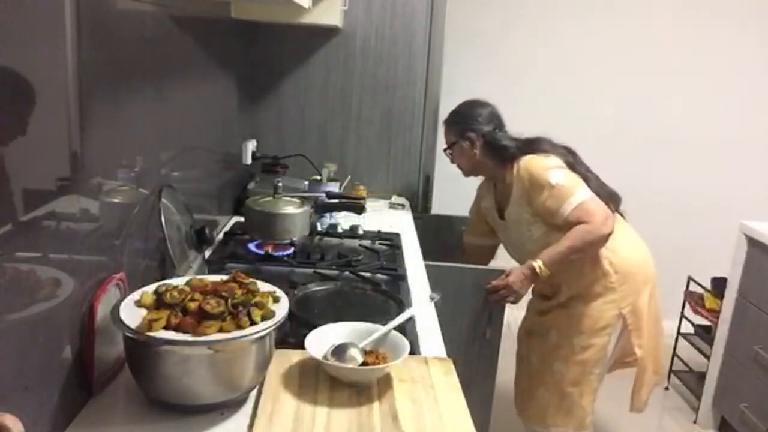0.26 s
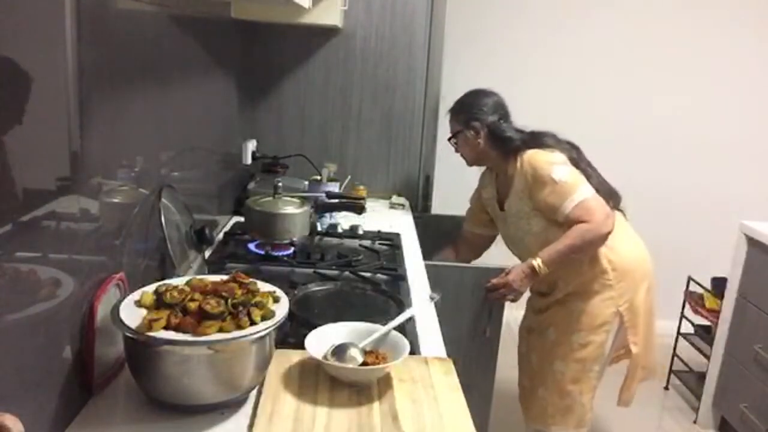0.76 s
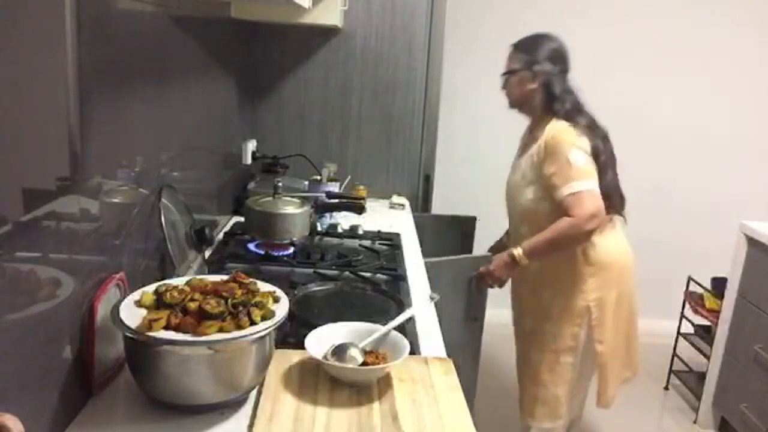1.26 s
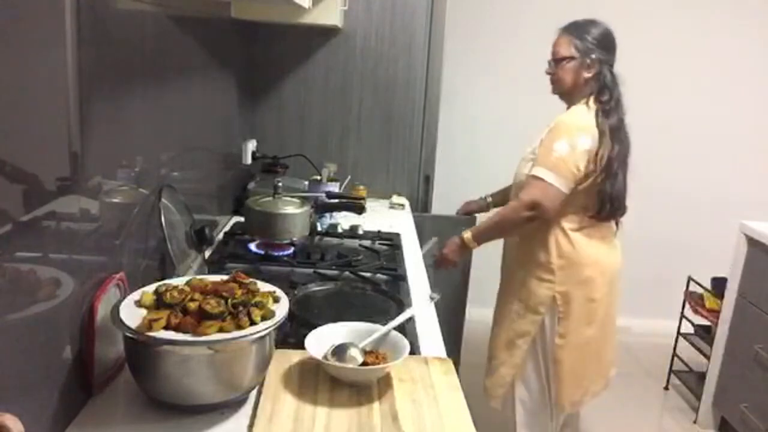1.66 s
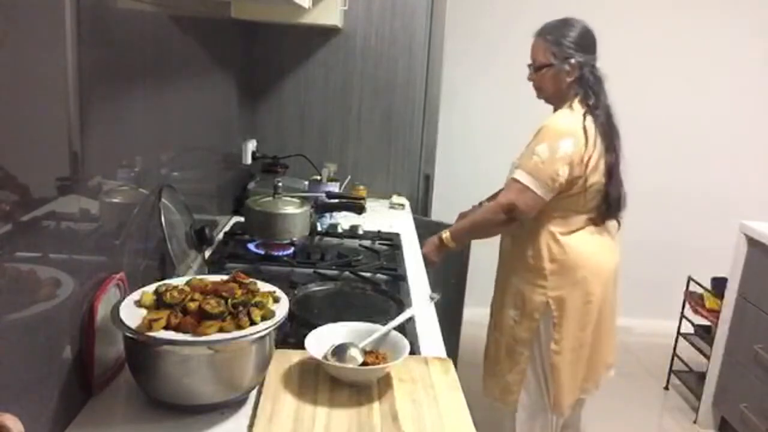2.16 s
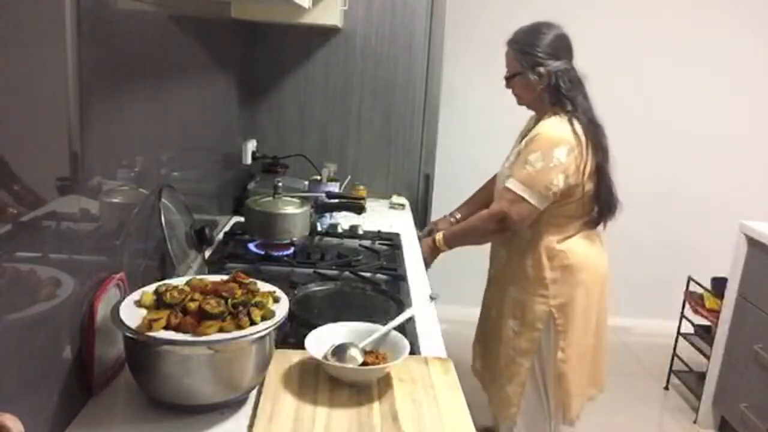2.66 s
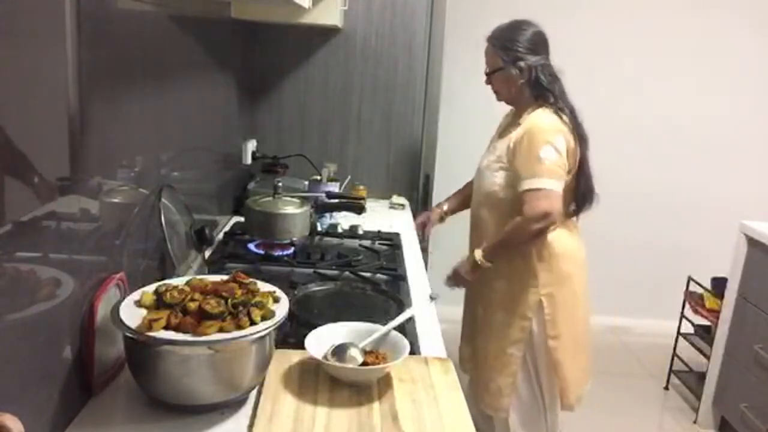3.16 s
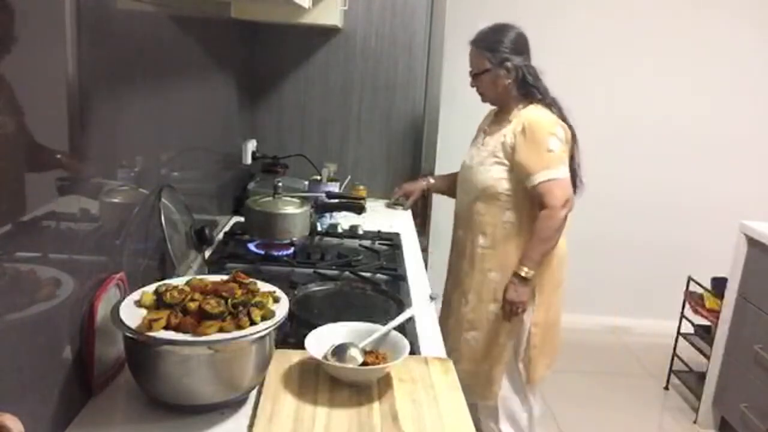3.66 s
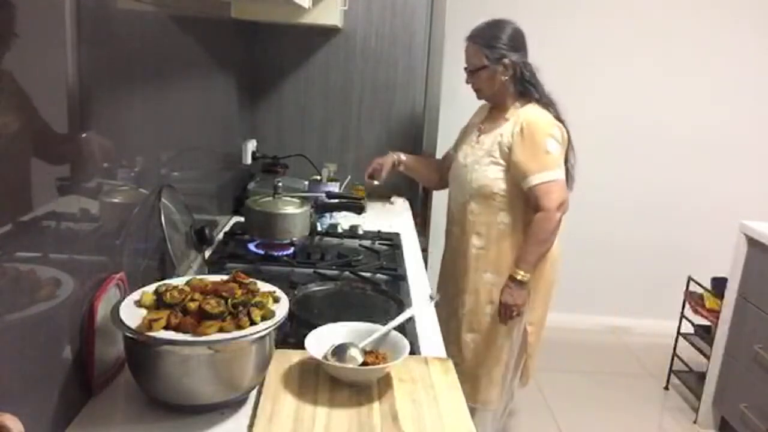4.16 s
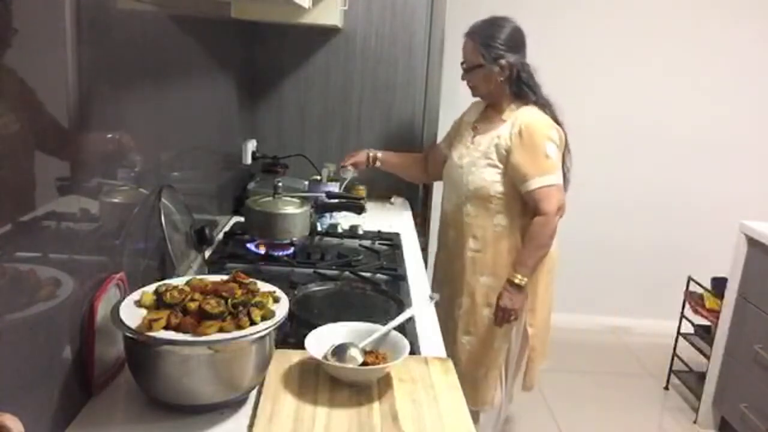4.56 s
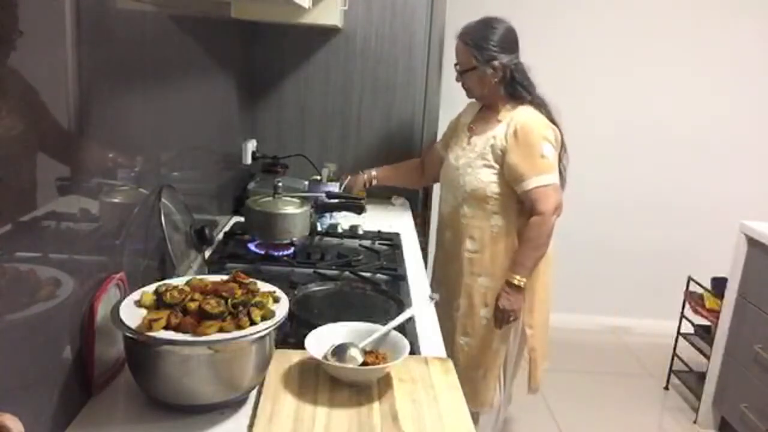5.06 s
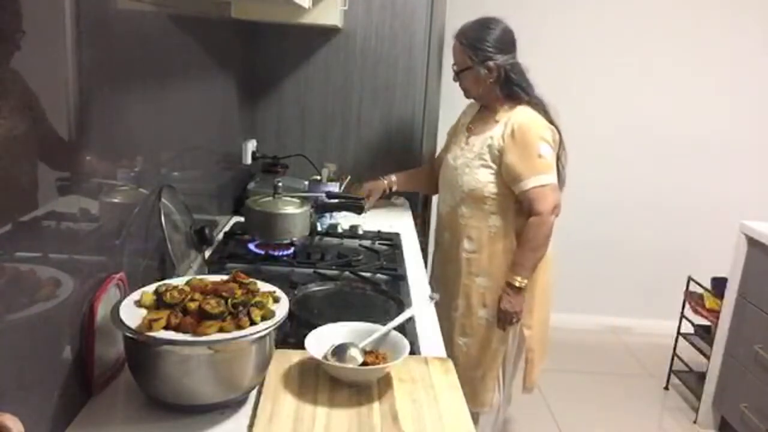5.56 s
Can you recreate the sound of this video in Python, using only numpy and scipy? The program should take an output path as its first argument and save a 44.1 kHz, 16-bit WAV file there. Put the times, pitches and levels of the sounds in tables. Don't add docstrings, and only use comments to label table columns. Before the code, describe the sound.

In a small echoing kitchen, a faint fan hum and gas hiss run throughout. Pots and a pan knock inside a cupboard, then after a pause a wooden door bumps, catches and rubs. It slams with a heavy, rattling boom, by far the loudest moment. Bangles tick, a tool is set down in quick taps, and a small lid clinks. One small microphone several steps away fades quiet moments.

```python
import sys
import numpy as np
from scipy import signal
from scipy.io import wavfile
from scipy.ndimage import uniform_filter1d

SR = 44100
rng = np.random.default_rng(int(sys.argv[2]) if len(sys.argv) > 2 else 0)


def ratio_of_db(decibels):
    return 10 ** (np.asarray(decibels, float) / 20)


def inscribe(sig):
    pcm = np.round(np.clip(np.atleast_2d(sig).T, -1, 1) * 32767)
    wavfile.write(sys.argv[1], SR, pcm.astype(np.int16))


N = 256220


def evened(x):
    return x / np.sqrt(np.mean(x ** 2) + 1e-20)


def read(points, hz):
    f, value = np.transpose(points)
    return np.interp(np.log(hz + 1), np.log(f + 1), value)


def follow(rows):
    s, db = np.transpose(rows)
    return ratio_of_db(np.interp(np.arange(N) / SR, s, db, left=-200, right=-200))


def swells(rows):
    t = np.arange(N) / SR
    total_db = sum(db * np.interp(t, [s - before, s, s + after], [0, 1, 0]) for s, db, before, after in rows)
    return ratio_of_db(total_db)


def waver(depth_db, size):
    return ratio_of_db(depth_db * evened(uniform_filter1d(rng.standard_normal(N), size=size)))


def colour(x, points):
    hz = abs(np.fft.fftfreq(8192, 1 / SR))
    log_gain = np.log(ratio_of_db(np.maximum(read(points, hz), -90)))
    taps = np.fft.ifft(np.exp(np.conj(signal.hilbert(log_gain)))).real[:4096]
    return signal.fftconvolve(x, taps)[:len(x)]


def whistle(bands):
    out = np.zeros(N)
    for hz, width, db in bands:
        r = np.exp(-np.pi * width / SR)
        turn = np.exp(2j * np.pi * hz * np.arange(N) / SR)
        slow = signal.lfilter([1], np.convolve([1, -r], [1, -r]), rng.standard_normal(N) / turn)
        out += ratio_of_db(db) * evened((slow * turn).real)
    return out


def rush(shape, patchy_db):
    frames, hz = N // 256 + 5, np.fft.rfftfreq(1024, 1 / SR)
    a, b, patches = rng.standard_normal((frames, 513, 3)).T
    patches = evened(uniform_filter1d(uniform_filter1d(patches, 4, 0), 12, 1))
    z = (a + 1j * b) * ratio_of_db(read(shape, hz)[:, None] + patchy_db * patches)
    return evened(signal.istft(z, nperseg=1024, noverlap=768)[1][:N])


# (frequency [Hz], time to fall 60 dB [s])
WALL_RING = [(60, 1), (200, 0.72), (700, 0.66), (2000, 0.75), (5000, 0.75), (12000, 0.11)]


def walls(dryness):
    build_up = np.minimum(np.arange(SR) / (0.0083 * SR), 1)
    taps = rng.standard_normal(SR) * (rng.random(SR) < .03) * build_up
    hz, t, z = signal.stft(taps, SR, nperseg=512)
    fall = ratio_of_db(-60 * dryness * t / read(WALL_RING, hz)[:, None])
    tail = signal.istft(z * fall, SR, nperseg=512)[1]
    return tail / np.linalg.norm(tail)


def contact(shape, tilt_db, u):
    tilted = [(hz, db + tilt_db * np.log2(hz / 1000)) for hz, db in shape]
    grains = rng.standard_normal(SR) * (0.61 + (rng.random(SR) < .08) * 1.6)
    rattle = colour(grains * u * np.exp(-3 * u), tilted)
    return rattle / (np.sqrt(uniform_filter1d(rattle ** 2, 256).max()) * 2.97)


def ringing(modes, splits, t):
    out = np.zeros(len(t))
    for (hz, db, t60), near in zip(modes, splits):
        for split in near:
            cycles = hz * (1 + 0.0062 * split) * t + 0.25 * rng.standard_normal()
            out += ratio_of_db(db - 60 * t / t60) * np.sin(2 * np.pi * cycles)
    return out


def struck(blows, shape, modes, modes_db, wet_db, dryness, cut_s):
    out, t, room = np.zeros(N + 2 * SR), np.arange(SR) / SR, walls(dryness)
    splits = rng.standard_normal((len(modes), 3))
    for s, db, contact_ms, tilt_db in blows:
        u = t / (contact_ms / 1000)
        rattle = contact(shape, tilt_db, u)
        ring = ratio_of_db(modes_db) * (1 - np.exp(-3 * u)) * ringing(modes, splits, t)
        echo = signal.fftconvolve(rattle + 0.24 * ring, room)[:SR]
        start = round((s - contact_ms / 6000) * SR)
        out[start:][:SR] += ratio_of_db(db) * (rattle + ring + ratio_of_db(wet_db) * echo)
    return out[:N] * ratio_of_db(-170 * np.maximum(np.arange(N) / SR - cut_s, 0))


# (frequency [Hz], level [dB])
HUM_TONES = [(100.1, -55), (87.93, -58)]
# (frequency [Hz], width [Hz], level [dB])
HOUSING = [(64.5, 20, -4), (99, 33, -2.5), (120.7, 54, -6.5)]
# (peak time [s], level above the murmur [dB], rise [s], fall [s])
BOOMS = [
    (.56, 16.5, 0.062, .08),
    (.84, 10, .05, .06),
    (2.345, 27.5, 0.027, 0.1),
    (2.68, 10.5, 0.091, .06),
    (3.08, 33.5, 0.06, 0.24),
    (3.4, 13, .2, 0.072),
    (4.13, 18.5, 0.12, .05),
]
# (deepest time [s], level [dB], fall [s], recovery [s])
DUCKS = [
    (.3, 0, 0.16, 0.29),
    (.97, -9, 0.086, 0.096),
    (2.44, -10, .05, 0.072),
    (2.76, -14, 0.092, 0.17),
    (3.5, -14, 0.068, 0.14),
    (4.19, -15.5, 0.2, 0.089),
    (4.36, -12, 0.13, 0.061),
    (5.48, -13, .05, 0.13),
]


def hum():
    t = np.arange(N) / SR - .0756
    tones = sum(np.sqrt(2) * ratio_of_db(db) * np.cos(2 * np.pi * hz * t) for hz, db in HUM_TONES)
    tones *= ratio_of_db(-1.86) * waver(1.5, 4000)
    murmur = whistle(HOUSING)
    murmur = evened(murmur / np.sqrt(uniform_filter1d(murmur ** 2, size=5000)))
    return swells(DUCKS) * (tones + ratio_of_db(-61) * swells(BOOMS) * murmur)


# (frequency [Hz], level [dB per Hz])
FAN = [(76, -48), (130, -7.5), (167, 0), (293, -3.5), (377, -7), (402, -8), (566, -6.5), (1440, -8),
       (1770, -12), (3000, -12.5), (3900, -36), (6600, -120)]
# (peak time [s], level above the fan [dB], rise [s], fall [s])
SHAKES = [
    (2.56, 13, 0.18, 0.18),
    (2.87, 10, 0.15, 0.077),
    (3.11, 34, 0.17, 0.18),
    (3.38, 13, 0.24, 0.34),
    (1.3, 5, .15, 0.16),
    (1.9, 4.5, 0.12, 0.091),
    (4.93, 5.5, 0.088, .12),
]
# (frequency [Hz], level [dB per Hz])
DUCT = [(260, -44), (450, -8), (648, -0.5), (707, -7), (1260, -4), (1450, -3.5), (1780, -2.5),
        (3000, -14.5), (3900, -32), (6600, -120)]


def fan():
    darker = [(hz, db - 12 * (hz > 500)) for hz, db in FAN]
    return ratio_of_db(-64) * swells(SHAKES) * rush(darker, 2.73) + ratio_of_db(-65.5) * rush(DUCT, 1.5)


# (frequency [Hz], level [dB per Hz])
FLAME = [(1470, -44), (2500, -12), (3120, -11), (3520, -7.5), (4710, -7.5), (5080, -10), (6150, -4),
         (7170, -7.5), (7800, -9), (8810, -1.5), (10400, -7), (11200, -5.5), (14400, -3.5), (15700, -4)]


def flame():
    return ratio_of_db(-53) * rush(FLAME, 3.15)


# (frequency [Hz], width [Hz], level [dB])
AIR_WHISTLES = [(1754, 23, -73), (2097, 56, -76.5), (8370, 690, -68)]


def air_whistles():
    return waver(2.5, 6000) * whistle(AIR_WHISTLES)


# (time [s], level [dB])
BOIL = [
    (0.0, -61),
    (1.16, -60),
    (1.86, -54),
    (2.68, -71),
    (3.68, -80),
    (3.83, -48.5),
    (4.71, -53),
    (5.1, -50.5),
    (5.81, -55),
]
# (frequency [Hz], level [dB per Hz])
VENT = [(5000, -34), (5700, -9), (6200, -2), (6600, -4), (7300, 4), (7900, -3.5), (8800, -13)]


def steam():
    return ratio_of_db(-6) * follow(BOIL) * rush(VENT, 4.7)


# (time [s], peak level [dB], contact time [ms], brightness [dB per octave])
SMALL_POT_BLOWS = [
    (.263, -33.5, 27, 1.5),
    (.289, -37.5, 16.7, -9.5),
]
# (frequency [Hz], level [dB per Hz])
SMALL_POT = [(290, -65), (500, -28), (903, -5), (1140, -1), (1450, -4), (1770, 5), (3550, -9), (4180, -12),
             (8000, -21), (10400, -33), (17600, -120)]
# (frequency [Hz], level [dB], time to fall 60 dB [s])
SMALL_POT_MODES = [(1130, -15, .1), (1800, -12, 0.12), (2050, -5, .08)]


def small_pot():
    return struck(SMALL_POT_BLOWS, SMALL_POT, SMALL_POT_MODES, -9, -2.0, 0.88, 0.6)


# (time [s], peak level [dB], contact time [ms], brightness [dB per octave])
BIG_POT_BLOWS = [
    (.492, -26.5, 19.3, 0.61),
    (.504, -24, 22, 0.24),
    (.549, -43, 18.9, -2),
]
# (frequency [Hz], level [dB per Hz])
BIG_POT = [(88, -63), (150, -11.5), (324, -4), (571, -18), (725, -6), (876, -8), (938, 0.5), (1680, -2),
           (1830, -0.5), (4860, -22.5), (5480, -11.5), (7710, -26), (9000, -28), (11700, -60),
           (19800, -120)]
# (frequency [Hz], level [dB], time to fall 60 dB [s])
BIG_POT_MODES = [(1000, -7, 0.13), (1370, -12, .15), (1686, -17, 0.11), (2110, -17, 0.18),
                 (5400, -10.5, .55), (5480, -15, .3)]


def big_pot():
    return struck(BIG_POT_BLOWS, BIG_POT, BIG_POT_MODES, -21.5, -4.5, 1.07, 0.97)


# (time [s], level [dB], three short modes [Hz])
TICKS = [
    (.736, -55, 1900, 2360, 2680),
    (3.723, -60, 1243, 2790, 3350),
    (3.736, -65, 1130, 3280, 5400),
]


def bangle_ticks():
    out, t = np.zeros(N), np.arange(2000) / SR
    for s, db, *modes_hz in TICKS:
        ping = sum(np.sin(2 * np.pi * (hz * (1 + 0.06 * split) * t + turn))
                   for hz in modes_hz for split, turn in rng.standard_normal((4, 2)))
        out[round(s * SR):][:len(t)] += ratio_of_db(db) * ping * t / 0.008 * np.exp(1 - t / 0.0068)
    return out


# (time [s], peak level [dB], contact time [ms], brightness [dB per octave])
PAN_BLOWS = [
    (.811, -28, 20, -1.3),
    (.827, -25.5, 14, -0.31),
    (.859, -35, 14.3, 0.39),
]
# (frequency [Hz], level [dB per Hz])
PAN = [(240, -28), (400, -24), (686, -10.5), (1040, -20), (1240, -7), (1420, -6.5), (1710, 0), (2570, -1),
       (3310, -11), (6500, -14.5), (9000, -30), (13000, -58), (22000, -120)]
# (frequency [Hz], level [dB], time to fall 60 dB [s])
PAN_MODES = [(1760, -10, 0.13), (2540, -23, 0.041), (3070, -5, 0.057)]


def pan():
    return struck(PAN_BLOWS, PAN, PAN_MODES, -7, -3.5, 1.2, 1.0)


# (time [s], peak level [dB], contact time [ms], brightness [dB per octave])
BUMP_BLOWS = [
    (2.326, -24, 21.4, 0.51),
    (2.346, -25, 20.8, -0.25),
    (2.384, -30.5, 19.8, 0.6),
    (2.429, -37, 18, 0),
]
# (frequency [Hz], level [dB per Hz])
BUMP = [(29, -54), (50, -24), (80, -4), (200, -6), (251, -6), (328, -3.5), (560, -15), (982, -11.5),
        (1180, -19), (1900, -17), (7000, -50.5), (9100, -81), (15400, -120)]
# (frequency [Hz], level [dB], time to fall 60 dB [s])
PANEL_MODES = [(191.6, -3, 0.19), (295, -9, 0.28), (330.6, -5.5, 0.44), (976, -1, 0.096), (1304, -2, 0.065),
               (1900, -16, 0.13)]


def door_bump():
    return struck(BUMP_BLOWS, BUMP, PANEL_MODES, -9.0, -6, 0.82, 2.5)


# (time [s], peak level [dB], contact time [ms], brightness [dB per octave])
CATCH_BLOWS = [
    (2.602, -27.5, 20.5, -1.5),
    (2.635, -47, 21, 14),
    (2.841, -43, 15.5, 4.5),
    (2.87, -53, 19, -7),
]
# (frequency [Hz], level [dB per Hz])
CATCH = [(59, -31.5), (100, 0.5), (605, -2.5), (826, 1.5), (1110, -7.5), (1310, 1.5), (1620, -15),
         (1930, -9), (5000, -35), (6500, -62.5), (11000, -120)]


def door_catch():
    return struck(CATCH_BLOWS, CATCH, PANEL_MODES, -21, -0.5, 0.92, 2.95)


# (time [s], level [dB])
RUBBING = [
    (2.645, -58),
    (2.655, -49),
    (2.691, -36.5),
    (2.749, -48),
    (2.785, -41),
    (2.8, -84),
]
# (frequency [Hz], level [dB per Hz])
RUB = [(35, -17), (60, -7), (323, 1.5), (595, -6.5), (894, -9), (1020, -17), (1140, -15), (1840, -9),
       (2130, -16.5), (5000, -49.5), (6500, -85), (11000, -120)]
# (frequency [Hz], width [Hz], level [dB])
RUB_MODES = [(320, 49, -11), (1595, 44, -17)]
# (time [s], level [dB])
SQUEAK = [
    (2.672, -64),
    (2.682, -39),
    (2.74, -41),
    (2.76, -65),
]


def door_rub():
    grains = rng.standard_normal(N) * (0.38 + rng.exponential(1, N) * (rng.random(N) < .03))
    near = follow(RUBBING) * evened(evened(colour(grains, RUB)) + whistle(RUB_MODES))
    near += follow(SQUEAK) * whistle([(920, 10.5, 0.0042)])
    return near + ratio_of_db(-7.5) * signal.fftconvolve(near, walls(2.9))[:N]


# (deepest time [s], level [dB], fade [s], reopening [s])
GATE = [
    (2.82, -22.5, 0.069, 0.02),
    (2.99, -36, 0.081, 0.021),
]


def noise_gate():
    return swells(GATE)


# (time [s], peak level [dB], contact time [ms], brightness [dB per octave])
SLAM_BLOWS = [
    (3.022, -8, 25.2, 0.75),
    (3.056, -12, 18.4, -0.5),
    (3.08, -10, 18, -0.3),
    (3.096, -14, 20, 2.5),
    (3.11, -13, 16, -1.5),
    (3.139, -17, 17.4, 1),
    (3.169, -23, 18, 0),
]
# (frequency [Hz], level [dB per Hz])
SLAM = [(18, -46), (30, -39), (56, -1), (135, -12), (184, -2), (350, -15), (386, -15.5), (552, -13.5),
        (684, -6), (828, -10.5), (978, -9), (1950, -9), (4960, -38), (9000, -66), (11700, -74),
        (19800, -120)]
# (frequency [Hz], level [dB], time to fall 60 dB [s])
DOOR_MODES = [(63.4, -8.5, 0.25), (77, -17, 0.15), (171, -3.5, 0.21), (191, 1, 0.18), (230, -5.5, 0.22),
              (391, -18.5, 0.37), (593, -17, 0.28), (702, -23, 0.34), (1010, -6.5, 0.4), (1238, -24, 0.12),
              (1178, -16, 0.19), (1370, -10, 0.14), (1555, 2, 0.088), (1690, -15, .25), (2000, -16, 0.3),
              (2260, -35, 0.23), (2715, -14, 0.2), (3140, -21.5, 0.14), (139, -10, 0.28)]


def door_slam():
    return struck(SLAM_BLOWS, SLAM, DOOR_MODES, -13.5, -6.5, 0.9, 3.48)


# (time [s], peak level [dB], contact time [ms], brightness [dB per octave])
TOOL_BLOWS = [
    (3.988, -28.5, 12.8, -1),
    (4.005, -33, 14.4, -2),
    (4.046, -34, 11.4, -3.5),
    (4.062, -42.5, 12.1, -1),
    (4.09, -53, 16, -7),
]
# (frequency [Hz], level [dB per Hz])
TOOL = [(120, -46), (200, -18), (347, -6), (542, -8.5), (654, 2.5), (929, -8), (1920, -6.5), (2320, -12.5),
        (5000, -32), (6500, -62), (11000, -120)]
# (frequency [Hz], level [dB], time to fall 60 dB [s])
TOOL_MODES = [(402, -16.5, 0.76), (656, -8, 0.15), (814, -2.5, 0.1), (1130, -8, .06), (1623, -7, .08)]


def tool():
    return struck(TOOL_BLOWS, TOOL, TOOL_MODES, -15.0, -6.5, 1.4, 4.16)


# (time [s], peak level [dB], contact time [ms], brightness [dB per octave])
LID_BLOWS = [
    (5.281, -38, 14, -1.5),
    (5.293, -38.5, 14, 1),
    (5.325, -42, 14, -.6),
]
# (frequency [Hz], level [dB per Hz])
LID = [(530, -64.5), (900, -24), (1390, -6), (2920, -11), (3290, -11), (4850, -10), (5260, -3.5),
       (15000, -26)]
# (frequency [Hz], level [dB], time to fall 60 dB [s])
LID_MODES = [(1374, 3.5, 0.074), (1431, -17, 0.64), (2120, -3, 0.077), (2593, -14, .1), (3354, -6.5, 0.16),
             (5400, -13, 0.43), (5700, -20, .12), (8130, -14, .08), (9840, -4.5, 0.14),
             (11900, -0.5, 0.089), (14200, -17, .04)]


def lid():
    softer = [(hz, db - 4.5 * (hz > 1500)) for hz, db in LID]
    return struck(LID_BLOWS, softer, LID_MODES, -8.5, -4.0, 0.66, 5.43)


def scene():
    background = hum() + fan() + flame() + air_whistles() + steam()
    pots = small_pot() + big_pot() + bangle_ticks() + pan()
    doors = door_bump() + door_catch() + door_rub() + door_slam()
    stove = tool() + lid()
    return (background + pots + doors + stove)[None]


def band_limit(x):
    return signal.sosfilt(signal.butter(12, 16680, fs=SR, output="sos"), x)


def record(dry):
    bass_cut_hz, treble_limit_hz = 45, 15715
    cut = signal.sosfilt(signal.butter(4, bass_cut_hz, "high", fs=SR, output="sos"), dry)
    limit = signal.firwin(1023, treble_limit_hz, window=("kaiser", 10), fs=SR)
    mix = signal.oaconvolve(cut, limit[None], "same") * noise_gate()
    return band_limit(mix)


dry = scene()
out = record(dry)
inscribe(out)
```